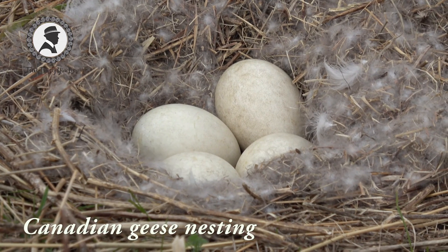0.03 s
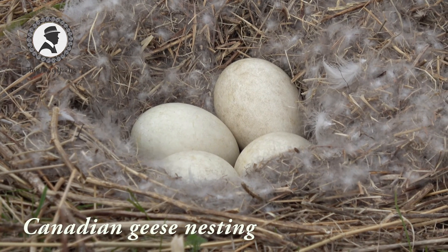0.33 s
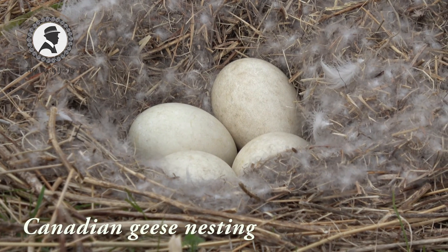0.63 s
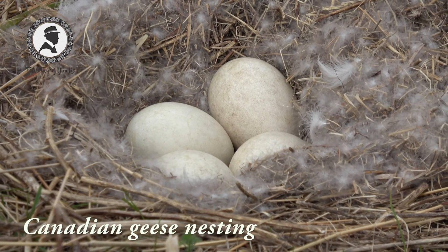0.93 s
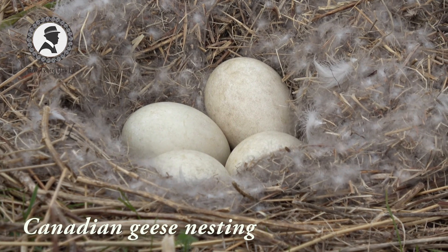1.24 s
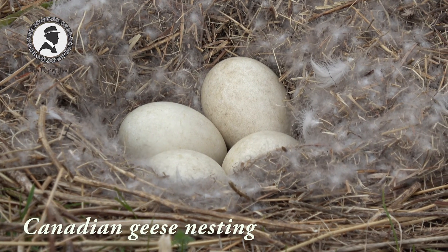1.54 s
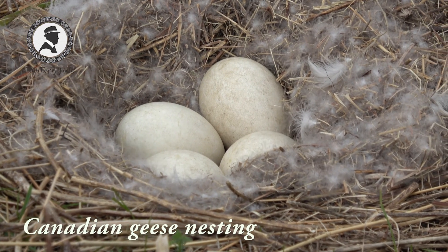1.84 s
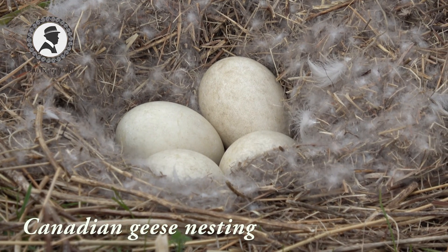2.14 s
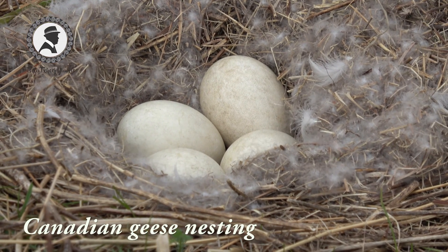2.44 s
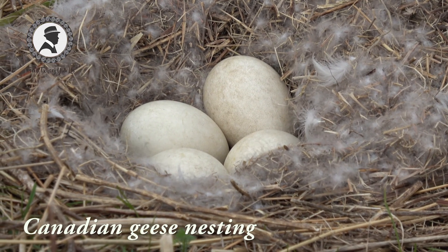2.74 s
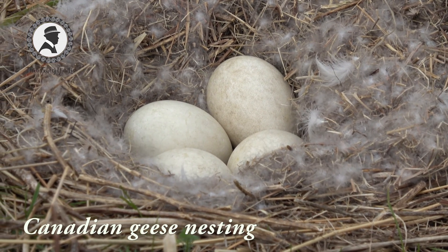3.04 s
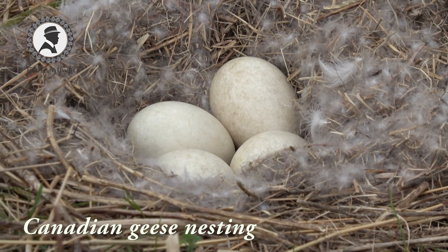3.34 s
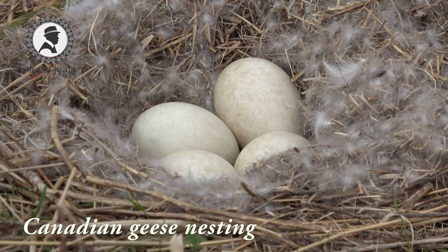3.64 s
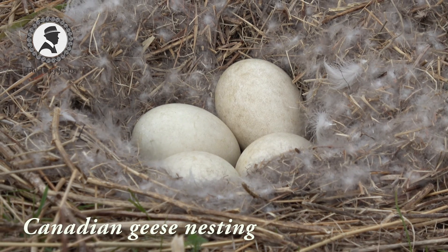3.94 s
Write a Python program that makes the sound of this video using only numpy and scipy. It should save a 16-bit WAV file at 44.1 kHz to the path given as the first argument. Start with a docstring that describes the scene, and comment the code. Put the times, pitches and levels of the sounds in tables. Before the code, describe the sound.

A nearby goose gives three short nasal honks, at about 1.1, 2.5 and 4 seconds, the last right at the end. Each swells from a grunt into a raspy tone with a faint echo. Dry straw rustles and snaps softly to the right, busiest between 2 and 2.8 seconds. Low wind, humming far engines and a soft wash of traffic fill the open air throughout.

```python
"""Low wind, the drone of far engines and a soft wash of traffic fill the open air. Dry straw rustles
and snaps a little to the right. Over this a goose gives three short honks beside its nest. Each starts
as a swelling grunt, pulses ringing in the throat, then breaks into a nasal tone with a breathy rasp
and sags in pitch as it stops. Trees and banks return a faint tail."""
import sys
import numpy as np
from scipy import signal
from scipy.fft import rfft, irfft
from scipy.io import wavfile

SR = 44100
rng = np.random.default_rng(int(sys.argv[2]) if len(sys.argv) > 2 else 0)


def log_audio(samples):
    """Write samples as a 16-bit WAV file to the path given in sys.argv[1]."""
    # one column per channel
    frames = np.atleast_2d(samples).T
    # limit to full scale, then quantise
    limited = np.clip(frames, -1, 1)
    pcm = np.round(limited * 32767).astype(np.int16)
    wavfile.write(sys.argv[1], SR, pcm)


N = 176400
TIME = np.arange(N) / SR
FREQS = np.maximum(np.arange(N + 1) * SR / (2 * N), 1)


def from_db(db):
    """Decibels to gain."""
    return 10 ** (np.asarray(db) / 20)


def rms_one(x):
    """Scale to an rms of one."""
    return x / np.sqrt(np.mean(x ** 2) + 1e-20)


def in_time(rows):
    """Turn timed breakpoints into one automation curve per value column."""
    seconds, *columns = np.transpose(rows)
    return [np.interp(TIME, seconds, column) for column in columns]


def at_hz(points):
    """Join breakpoints along log frequency."""
    hz, value = np.transpose(points)
    return np.interp(np.log(FREQS), np.log(hz), value)


def filtered(x, response):
    """Apply a frequency response."""
    return irfft(rfft(x, 2 * N) * response)[..., :N]


def minimum_phase(db):
    """A response with these levels and no pre-ringing."""
    cepstrum = irfft(db * np.log(10) / 20)
    return np.exp(rfft(cepstrum * (1 + np.sign(np.fft.fftfreq(len(cepstrum))))))


def colour(x, spectrum):
    """Apply an EQ curve, scaled so that white noise keeps its power."""
    response = minimum_phase(at_hz(spectrum))
    return filtered(x, response / np.sqrt(np.mean(abs(response) ** 2)))


def drift(rate_hz):
    """Random modulation with an rms of one, rolled off above the rate."""
    return rms_one(filtered(rng.standard_normal(2 * N), 1 / (1 + (FREQS / rate_hz) ** 2)))


def pan(left_minus_right_db):
    """Left and right gains whose mean is one."""
    ratio = np.atleast_1d(from_db(left_minus_right_db))
    return 2 * np.array([ratio, np.ones_like(ratio)]) / (1 + ratio)


def stereo(x, correlation):
    """Use two unrelated signals as mid and side; higher correlation narrows the image."""
    c = np.clip(correlation, 0, .999)
    side = filtered(x[1], np.sqrt((1 - c) / (1 + c)))
    return x[0] + side * np.array([[1], [-1]])


# The wind's EQ. Each row: frequency in Hz, relative level in dB.
WIND_EQ = [(21, -22.5), (36, -22.5), (51, -4.5), (86, -2.5), (126, 1), (162, -7), (225, -11.5), (325, -20),
           (510, -28), (1100, -62)]
WIND_DB, WIND_FLUTTER_DB = -29.5, 0.55


def wind():
    """Moving air: a low noise rumble with a slight flutter."""
    rumble = colour(rng.standard_normal((2, N)), WIND_EQ)
    return rumble * from_db(WIND_DB + WIND_FLUTTER_DB * drift(21))


# The traffic's EQ. Each row: frequency in Hz, relative level in dB.
TRAFFIC_EQ = [(150, -1), (300, -8), (450, -5), (650, 4), (950, 3), (1400, -3.5), (2000, -7.5),
              (3000, -18.5), (4500, -29.5), (8000, -41.5), (15000, -75)]
# Its fader ride. Each row: time in seconds, level in dB before the trim.
TRAFFIC_RIDE = [(0.0, -42.5), (0.88, -44), (1.12, -41.5), (1.58, -45), (3.57, -44.5), (3.84, -44)]
TRAFFIC_TRIM_DB = 7.6


def traffic():
    """Distant traffic blurs into a gently swelling midrange wash."""
    ride_db, = in_time(TRAFFIC_RIDE)
    wash = colour(rng.standard_normal((2, N)), TRAFFIC_EQ)
    return wash * from_db(TRAFFIC_TRIM_DB + ride_db + .5 * drift(6.3))


# The farthest engines. Each row: pitch in Hz, level in dB, pitch wander in Hz.
ENGINE_DRONES = [(53.3, -41, 2.2), (81, -36, 1.56), (190.5, -46, 1.09)]
# Two nearer engine tones. Each row: time in seconds, pitch in Hz, level in dB before the trim.
LOW_ENGINE = [(0.0, 112, -42), (0.08, 109.7, -26.5), (0.98, 108.1, -23.5), (1.15, 113.6, -45),
              (1.37, 108.2, -32.5), (2.52, 106.7, -30), (2.65, 113.5, -24), (3.58, 113.7, -17.5),
              (4.0, 111.7, -24)]
HIGH_ENGINE = [(0.0, 137.2, -28), (0.75, 135.1, -30), (3.65, 132.3, -27.5), (4.0, 134.1, -26)]
LOW_TRIM_DB, HIGH_TRIM_DB = -4.94, -3.5


def engines():
    """Far engines hum as low sines that waver in pitch and level."""
    tracks = [(hz + wander * drift(3.06), db) for hz, db, wander in ENGINE_DRONES]
    for curve, trim_db in ((LOW_ENGINE, LOW_TRIM_DB), (HIGH_ENGINE, HIGH_TRIM_DB)):
        hz, db = in_time(curve)
        tracks.append((hz + 0.83 * drift(2.7), db + trim_db))
    return sum(np.sqrt(2) * from_db(db + 2.3 * drift(1.5)) * np.sin(2 * np.pi * np.cumsum(hz) / SR)
               for hz, db in tracks)


# The bed's balance. Each row: frequency in Hz, left minus right in dB.
BED_PAN = [(52, 2), (112, -3.5), (205, -4), (385, -17.5), (710, -16), (1290, -14), (2380, -8),
           (4450, -10.5), (8100, 13)]
# Width of wind and traffic. Each row: frequency in Hz, left-right correlation from 0 to 1.
BED_CORRELATION = [(60, 1), (150, 0.94), (380, 0.85), (950, 0.67), (2380, 0.86), (5980, 1), (15000, 0.76)]


def background():
    """Wind, traffic and engines form a bed that leans to the right."""
    air = stereo(wind() + traffic(), at_hz(BED_CORRELATION))
    return filtered(air + engines(), pan(at_hz(BED_PAN)))


# Brushes through the straw. Each row: start in seconds, hold in seconds, level in dB before the trims.
BRUSHES = [(0.373, 0.34, -61), (0.844, 0.29, -55.5), (1.34, 0.06, -58), (2.01, 0.53, -49),
           (2.605, 0.42, -60.5), (3.03, 0.16, -52), (3.221, 0.3, -56), (3.533, 0.2, -52.5)]
# The rustle's EQ. Each row: frequency in Hz, relative level in dB.
RUSTLE_EQ = [(1500, -12), (2800, -2.5), (4200, 2.5), (6500, 0.5), (9500, -3), (11000, -7), (12700, -4),
             (14500, -16), (16000, -22)]
BRUSH_RISE_DB_PER_S, BRUSH_FALL_DB_PER_S, STIR_FLOOR_DB = 450, 254, -67
SLIDE_TRIM_DB, CRACKLE_TRIM_DB = -1.5, -5
CRACKLES_PER_S, CRACKLE_SPREAD_DB, CRACKLE_DECAY_S = 130, 2.5, 0.00028


def rustle():
    """Brushed stalks slide with a hiss and crackle in tiny grains; a faint stir lies between brushes."""
    power = from_db(STIR_FLOOR_DB) ** 2
    for start, hold, db in BRUSHES:
        fade_in_db = BRUSH_RISE_DB_PER_S * np.maximum(start - TIME, 0)
        fade_out_db = BRUSH_FALL_DB_PER_S * np.maximum(TIME - start - hold, 0)
        power = power + from_db(db - fade_in_db - fade_out_db) ** 2
    sizes = from_db(CRACKLE_SPREAD_DB * np.minimum(rng.exponential(1, N), 4.2))
    ticks = sizes * (rng.random(N) < CRACKLES_PER_S / SR)
    grains = signal.lfilter([1], [1, -np.exp(-1 / (CRACKLE_DECAY_S * SR))], ticks + 1e-18)
    texture = np.hypot(from_db(SLIDE_TRIM_DB), from_db(CRACKLE_TRIM_DB) * rms_one(grains))
    return colour(np.sqrt(power) * texture * rng.standard_normal((2, N)), RUSTLE_EQ)


def burst(start, db, t60):
    """Envelope of a sudden crack that dies away."""
    return (TIME >= start) * from_db(db - 60 * np.clip((TIME - start) / t60, 0, 2))


# Stalks snap. Each row: start in seconds, level in dB before the trim, body against treble in dB.
STALK_SNAPS = [(0.4065, -22, -5), (0.547, -31, -18), (0.5622, -32.5, -10), (0.6678, -32, -14),
               (0.8116, -32, -9), (1.3573, -23.5, -11), (1.388, -37, -14), (1.8997, -42, 11),
               (2.0057, -32, 5), (2.139, -22.5, 1), (2.2628, -26, -7), (2.3196, -23, -5),
               (2.3614, -22.5, -11), (2.4069, -24.5, -6), (2.4463, -29, -14), (2.5775, -36, -14),
               (2.616, -31, -17), (2.628, -26, -1), (2.6712, -29, -14), (2.6898, -34, -14),
               (2.8476, -32, -11), (3.4032, -25.5, -10), (3.5862, -26.5, -14)]
# A thicker twig gives way. Each row: start in seconds, level in dB.
TWIG_SNAPS = [(2.628, -24.5)]
# EQs for a snap's bright edge and its body. Each row: frequency in Hz, relative level in dB.
SNAP_TREBLE_EQ = [(1550, -3), (3050, -3.5), (5100, -.5), (9100, -8), (15900, -17.5)]
SNAP_BODY_EQ = [(210, -20), (620, 22), (1450, 14), (3100, -2.5), (8100, -34)]
STALK_TRIM_DB, STALK_T60_S, TWIG_T60_S = -7, 0.012, 0.037


def snaps():
    """Dry stalks break in short bursts of noise; the twig is all body and lasts longer."""
    treble = sum(burst(start, db + STALK_TRIM_DB, STALK_T60_S) for start, db, _ in STALK_SNAPS)
    body = sum(burst(start, db + body_db + STALK_TRIM_DB, STALK_T60_S)
               for start, db, body_db in STALK_SNAPS)
    body += sum(burst(start, db, TWIG_T60_S) for start, db in TWIG_SNAPS)
    return sum(colour(envelope * rng.standard_normal((2, N)), eq)
               for envelope, eq in ((treble, SNAP_TREBLE_EQ), (body, SNAP_BODY_EQ)))


def straw():
    """The nest's straw rustles and snaps, wide and to the right."""
    return stereo(rustle() + snaps(), correlation=0.3) * pan(left_minus_right_db=-8)


# The goose's place in the image. Each row: frequency in Hz, left minus right in dB.
GOOSE_BALANCE = [(390, -4.5), (690, -4.5), (1300, -2.5), (4300, -3.5), (8100, 0.7)]
TAIL_DB, TAIL_T60_S = -21, .42


def outdoors(call):
    """The call comes from the right; trees and banks scatter a faint tail."""
    tail = rms_one(rng.standard_normal((2, N)) * from_db(-60 * TIME / TAIL_T60_S)) / np.sqrt(N)
    return filtered(call, pan(at_hz(GOOSE_BALANCE)) + from_db(TAIL_DB) * rfft(tail, 2 * N))


def resonance(x, hz, width_hz):
    """Two-pole resonance with a peak gain of one."""
    r = np.exp(-np.pi * width_hz / SR)
    poles = [1, -2 * r * np.cos(2 * np.pi * hz / SR), r * r]
    return signal.lfilter(np.array([1, 0, -1]) * (1 - r * r) / 2, poles, x)


# Throat formants. Each row: centre in Hz, bandwidth in Hz, relative level in dB.
FORMANTS = [(638, 67, -7.5), (817, 173, -11.5), (1140, 81, -4), (1318, 113, -5), (2380, 145, -28)]


def grunt(pulses):
    """Each pulse rings the throat's formants, summed in alternating polarity."""
    return rms_one(sum((-1) ** k * from_db(db) * resonance(pulses, hz, width)
                       for k, (hz, width, db) in enumerate(FORMANTS)))


# The rasp's EQ. Each row: frequency in Hz, relative level in dB.
RASP_EQ = [(410, -42), (1520, 5), (2000, -1), (2500, 5.5), (3200, -6.5), (3900, -1.5), (4600, -8),
           (5950, 0), (7450, -11), (10900, -16.5), (15900, -40)]


def rasp(pulses, cycles):
    """Each pulse adds a buzzy click and a fading puff of air."""
    puffs = rms_one(rng.standard_normal(N) * np.exp(-3.2 * (cycles % 1)))
    return rms_one(colour(rms_one(pulses) + puffs, RASP_EQ))


# The nasal timbre. Each row: harmonic number, relative level in dB.
NASAL_HARMONICS = [(1, -22), (2, -41), (3, -25), (4, -9), (5, -22), (6, -30), (7, -6), (8, 0), (9, -25),
                   (10, -39), (11, -28), (12, -25), (13, -30), (14, -37), (15, -26), (16, -32), (17, -34),
                   (18, -43), (19, -37), (20, -38), (21, -35), (22, -40), (23, -29), (24, -34), (25, -38),
                   (26, -38), (27, -32), (28, -28), (29, -42), (30, -40), (31, -37), (32, -35), (33, -46),
                   (34, -47), (35, -44), (36, -44), (37, -45), (38, -45)]
TREBLE_SHELF_HZ, TREBLE_FLUTTER_DB = 3180, 1.5


def nasal_tone(cycles, treble_db):
    """Harmonics of the pulse rate, played from a wavetable; the treble flickers."""
    levels = [db for _, db in NASAL_HARMONICS]
    partials = minimum_phase(np.pad(levels, 1, mode="edge"))[1:-1]
    phase = np.linspace(0, 1, 2048)
    wavetable = sum(np.real(p * np.exp(2j * np.pi * k * phase)) for k, p in enumerate(partials, 1))
    tone = np.interp(cycles % 1, phase, rms_one(wavetable))
    treble = filtered(tone, 1 / (1 + (TREBLE_SHELF_HZ / FREQS) ** 10))
    return tone + treble * (from_db(treble_db + TREBLE_FLUTTER_DB * drift(150)) - 1)


# The honks. Each row: time of the voice break in seconds, hold in seconds, level in dB,
# swell of the grunt in dB per second, treble trim in dB.
GOOSE_HONKS = [(1.090, 0.060, -12.9, 220, 0), (2.515, 0.053, -12.6, 260, -5),
               (3.958, 0.061, -13.0, 330, -6)]
GRUNT_HZ, HONK_HZ, BREAK_S = 141.9, 165.66, 0.0093
GRUNT_JITTER, HONK_JITTER = 0.046, .004  # fractions of the pitch
SAG_S, SAG_HZ, SAG_LIFT_DB = 0.042, 9.3, 0.5  # pitch drop and slight lift reached as the hold ends
TONE_LAG_S, ATTACK_DB_PER_S, RELEASE_DB_PER_S = 0.0042, 576, 1435
GRUNT_DB, GRUNT_FADE_DB_PER_S = -5.5, 911
RASP_DB, RASP_SWELL_SHARE, RASP_FADE_DB_PER_S = -25.5, 0.46, 70
CRACK_DB, CRACK_HALF_WIDTH_S = -24, 0.0087


def goose():
    """One pulse rate drives grunt, tone and rasp; it jumps at the break and sags at the end."""
    honks = np.array(GOOSE_HONKS)
    nearest = np.argmin(abs(TIME[:, None] - honks[:, 0]), axis=1)
    break_time, hold, level_db, swell, treble_db = honks[nearest].T
    t = TIME - break_time
    before, after = np.maximum(-t, 0), np.maximum(t, 0)
    voiced = np.clip(1 + t / BREAK_S, 0, 1)  # 0 in the grunt, 1 in the tone
    sag = np.clip(1 + (t - hold) / SAG_S, 0, 2) ** 2

    pitch_hz = GRUNT_HZ + (HONK_HZ - GRUNT_HZ) * voiced - SAG_HZ * sag
    jitter = (GRUNT_JITTER * (1 - voiced) + HONK_JITTER * voiced) * drift(110)
    cycles = np.cumsum(pitch_hz * (1 + jitter)) / SR
    pulses = np.diff(np.floor(cycles), prepend=0)
    pulses *= from_db(2.5 * rng.standard_normal(N))  # uneven in strength

    attack_db = ATTACK_DB_PER_S * np.maximum(TONE_LAG_S - t, 0)
    release_db = RELEASE_DB_PER_S * np.maximum(t - hold, 0)
    tone_gain = from_db(SAG_LIFT_DB * sag - release_db - attack_db)
    grunt_gain = from_db(GRUNT_DB - swell * before - GRUNT_FADE_DB_PER_S * after)
    rasp_gain = from_db(RASP_DB - RASP_SWELL_SHARE * swell * before
                        - RASP_FADE_DB_PER_S * after - release_db)
    # The rasp flares into a rough crack as the voice breaks.
    rasp_gain += from_db(CRACK_DB + treble_db) * np.exp(-((t - TONE_LAG_S) / CRACK_HALF_WIDTH_S) ** 2)
    return from_db(level_db) * (tone_gain * nasal_tone(cycles, treble_db)
                                + grunt_gain * grunt(pulses)
                                + rasp_gain * rasp(pulses, cycles))


def scene():
    """The goose and its nest over the outdoor bed."""
    return outdoors(goose()) + straw() + background()


def record(dry, cutoff_hz=15700):
    """A steep low-pass takes the very top off the mix."""
    return signal.sosfilt(signal.ellip(10, .1, 80, cutoff_hz, fs=SR, output="sos"), dry)


dry = scene()
out = record(dry)
log_audio(out)
```